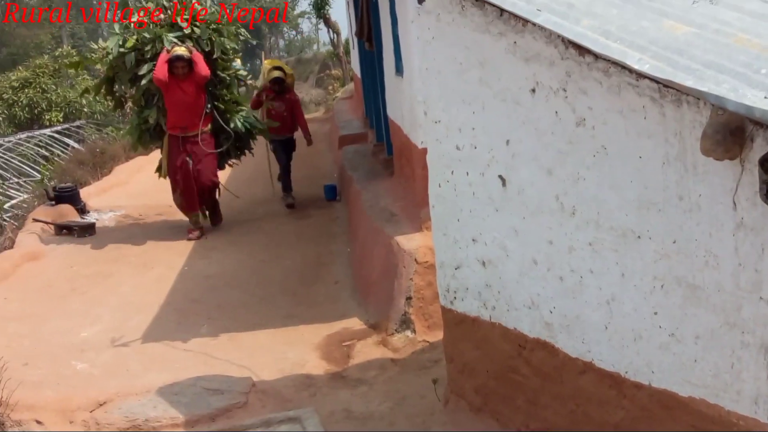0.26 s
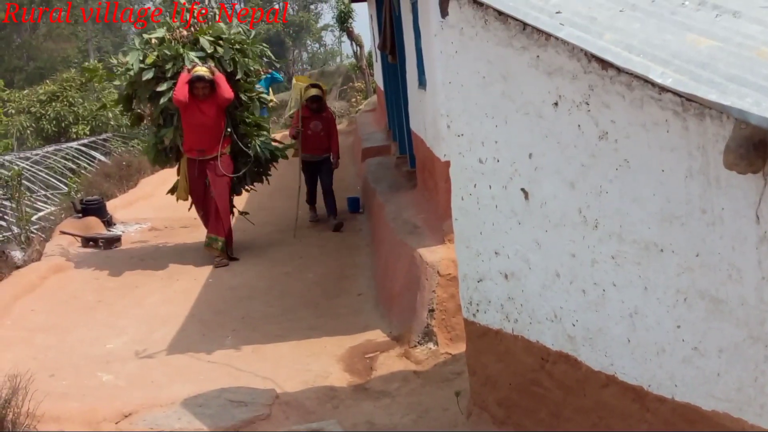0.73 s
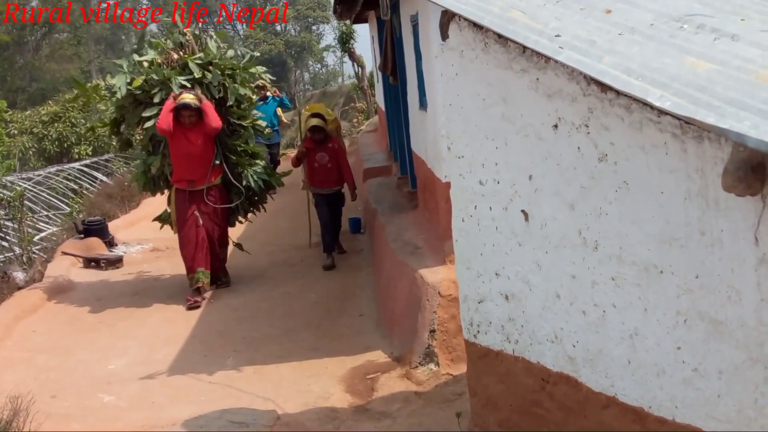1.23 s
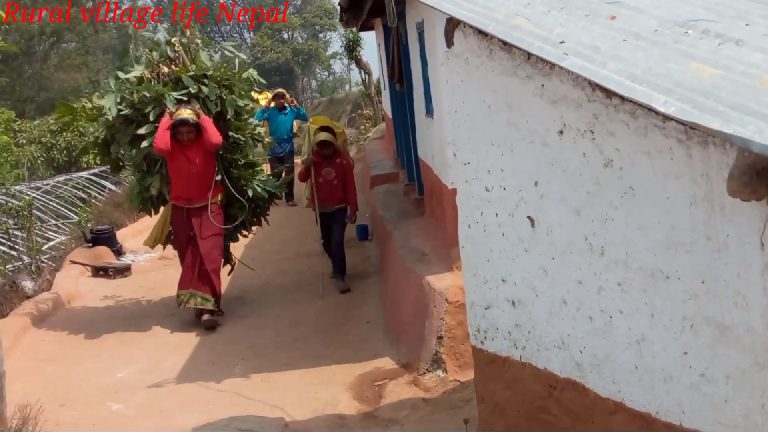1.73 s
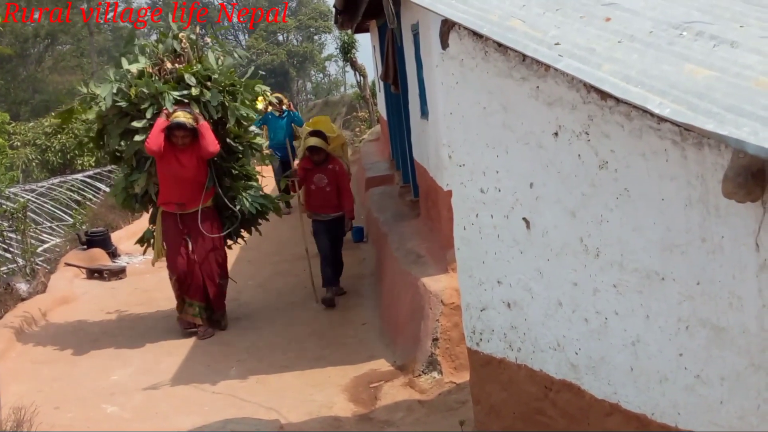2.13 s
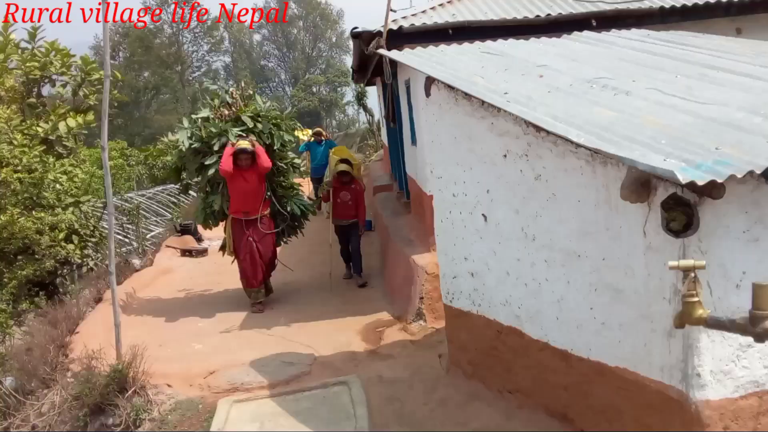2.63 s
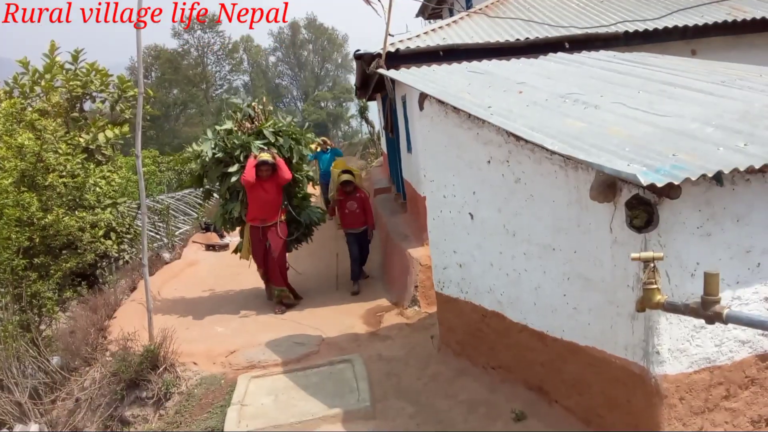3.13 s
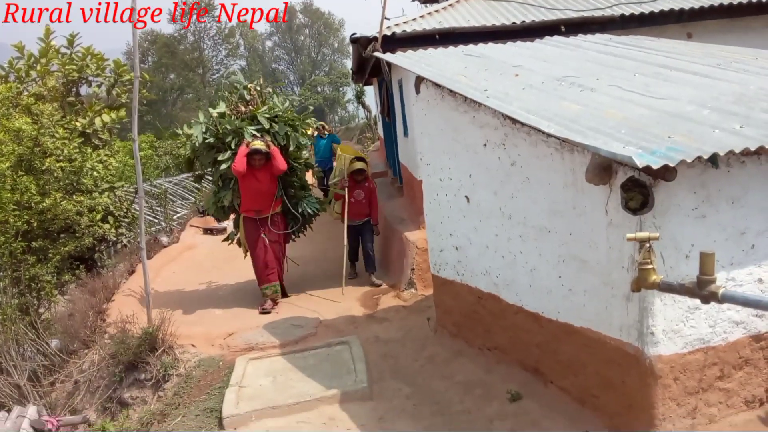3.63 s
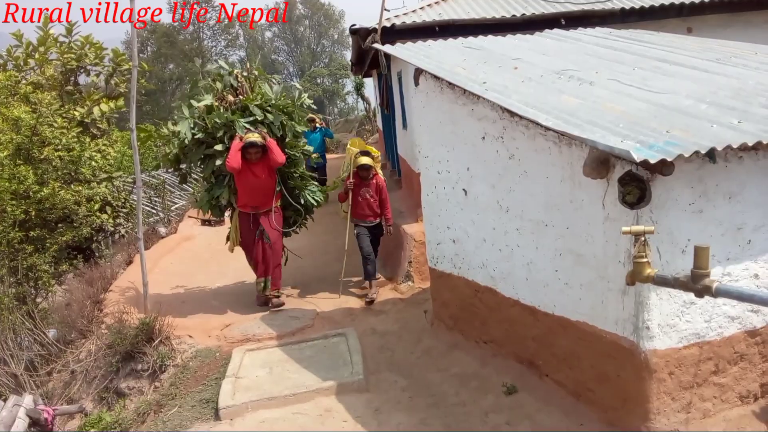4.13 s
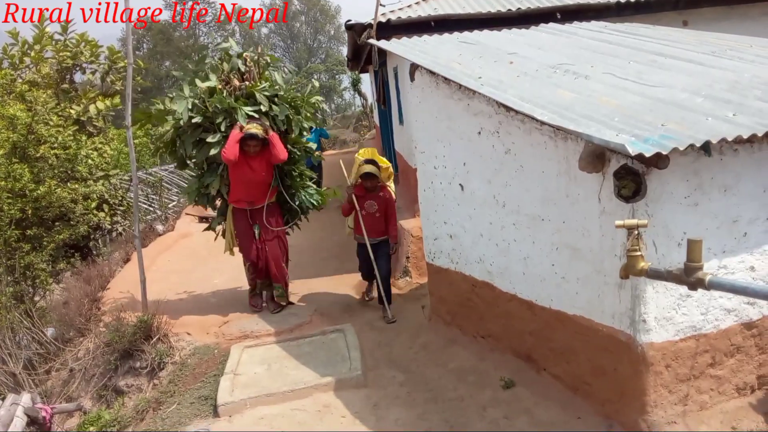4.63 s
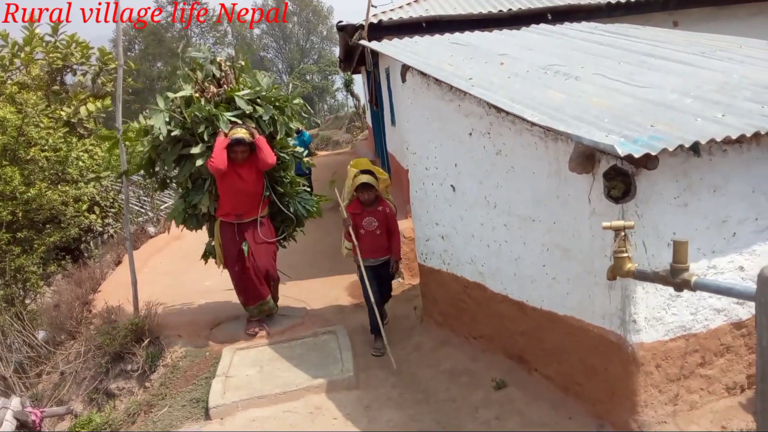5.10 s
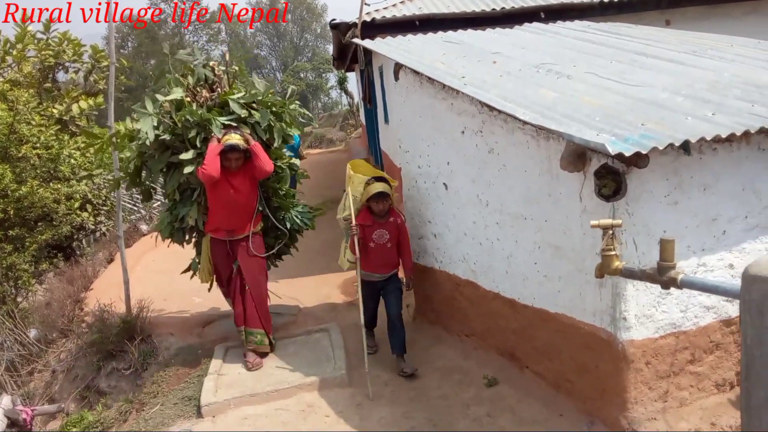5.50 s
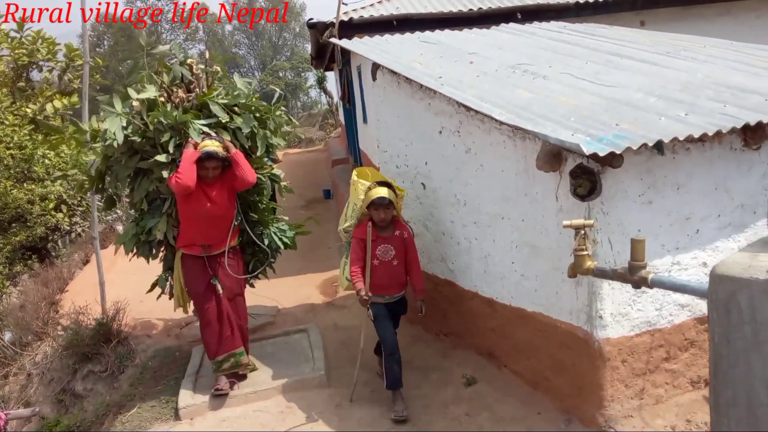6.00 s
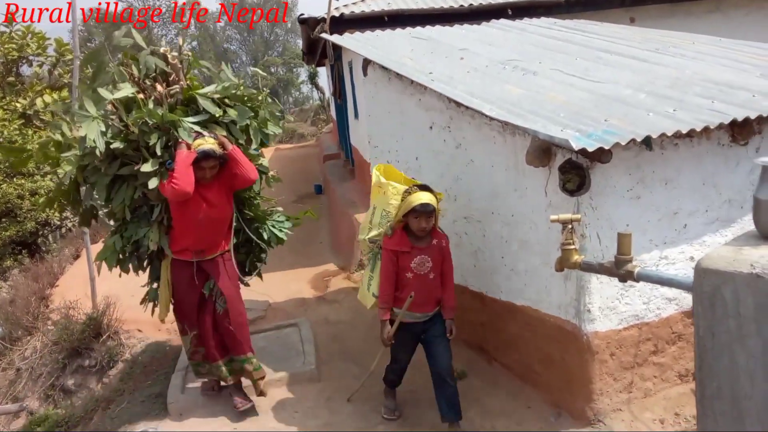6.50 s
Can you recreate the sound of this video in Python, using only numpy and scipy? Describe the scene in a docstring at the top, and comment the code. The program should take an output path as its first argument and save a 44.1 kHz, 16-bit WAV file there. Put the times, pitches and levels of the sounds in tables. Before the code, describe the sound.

Throbbing goat bleats, first low then higher, sound beside a house wall over bassy wind puffs, gritty footsteps, leaf rustle and small ticks.

```python
"""Dirt yard beside a house wall: a low-voiced nanny, three higher voices and a far kid bleat, at times overlapping.
Each bleat is a chain of throbs in pitch and loudness, about ten a second: pulses and breath through throat resonances.
Some begin as a hum until the mouth opens; a faint drone of steady partials sounds at the start.
Wind puffs thump on the microphone as lumpy bass noise; feet scuff and leaves rustle as bursts of gritty noise.
Short ticks and soft knocks of hoof on wood stand over a quiet, flickering hush of noise bands."""
import sys
import numpy as np
from scipy import signal
from scipy.io import wavfile
from scipy.ndimage import uniform_filter1d, map_coordinates

SR = 44100
rng = np.random.default_rng(int(sys.argv[2]) if len(sys.argv) > 2 else 0)


def int16_out(signal):
    """Quantize to a 16-bit WAV file."""
    q = np.round(np.clip(np.atleast_2d(signal).T, -1, 1) * 32767)
    wavfile.write(sys.argv[1], SR, q.astype(np.int16))


N = 297675

# how each voice opens its mouth: opens_s, dip_depth_db, shut_nose_db, shut_top_db, level_crest_flatness
MOUTH_MANNER = {"grunt": (.9, 31, 2, -21, 1), "nanny": (0.73, 1.9, 11, -6.5, 2.2),
                "hum": (3.9, 4, 0, -.3, 0), "wavering": (2.22, 11, 0, -12, 1),
                "steady": (3.3, 15.5, 0, 0, 1.4), "chopped": (5.5, 20.5, 2, -0.5, 1.64),
                "turned": (6.5, 12, 7, 7, 1.9), "kid": (-3, 20, .3, 2, 3.5)}
# how each voice throbs: pitch_sag (0-1), pitch_crest_flatness, dip_place between crests (0-1),
# hum_share of the throb while humming (0-1)
THROB_SWING = {"grunt": (.02, 1.5, .55, 1), "nanny": (.08, .9, .6, .4), "wavering": (.13, .75, .46, 1),
               "hum": (.01, 1, .5, 1), "steady": (.165, 2, .6, 1), "chopped": (.09, 1.8, .57, 1),
               "turned": (.07, 1.2, .52, 1), "kid": (.06, 2, .55, 1)}


def amp(db):
    """Gain of a level in dB."""
    return 10 ** (np.asarray(db) / 20)


def rms_one(x):
    """Scaled to rms 1."""
    return x / np.sqrt(np.mean(x ** 2) + 1e-20)


def band(x, low_hz, high_hz, order=2):
    """Butterworth band-pass."""
    edges_hz = [low_hz, min(high_hz, .45 * SR)]
    return signal.sosfilt(signal.butter(order, edges_hz, "band", fs=SR, output="sos"), x)


def wobble(n, hz):
    """Smooth random drift at about hz, spread near 1."""
    step = max(int(SR / hz / 16), 1)
    at = np.arange(0, n + step, step)
    knots = rng.standard_normal(size=5000)
    smooth = map_coordinates(knots, [1 + at / SR * hz * 2], order=3)
    return np.interp(np.arange(n), at, smooth)


def resonance(x, hz, width_hz):
    """Two-pole resonance with gain 1 on top."""
    r = np.exp(-np.pi * width_hz / SR)
    top = np.array([1, 0, -1]) * (1 - r * r) / 2
    return signal.lfilter(top, [1, -2 * r * np.cos(2 * np.pi * hz / SR), r * r], x)


def bump(t, at, rise, fall):
    """Envelope in dB: up 20 dB over rise, down 20 dB over fall."""
    return np.where(t < at, -20 * (at - t) / rise, -20 * (t - at) / fall)


def goats():
    """All bleats, with wall and ground echoes and a short diffuse tail from the yard."""
    # throbs of each bleat: crest_s, pitch_hz, level_db, brightness_db
    nanny_grunt = [(.475, 206.5, -40, -5)]
    nanny_first = [(.59, 259.8, -44, -5), (.658, 281, -41, -1.5), (.79, 293.6, -25, 5.5),
                   (.902, 293.3, -24.5, 5), (1.01, 290.3, -26.5, 4.5), (1.11, 278.8, -29, 3.5),
                   (1.206, 242.6, -30.5, -8), (1.25, 234.7, -33.5, -4), (1.335, 186.4, -44.5, -4)]
    far_kid = [(1.415, 544, -49, -0.5), (1.515, 529.3, -54, 1)]
    wavering = [(2.022, 425, -45.5, -4.5), (2.102, 509.5, -39, 7.5), (2.178, 519.4, -34, 4.5),
                (2.262, 515.7, -35.5, 12), (2.358, 527, -33.5, 7.5), (2.454, 516, -32, 3.5),
                (2.554, 486.3, -34.5, -3.5), (2.642, 484.7, -34, -3.5), (2.734, 434.8, -39, -5),
                (2.826, 476, -39, -1.5), (2.91, 486.5, -37.5, 0.5)]
    steady_hum = [(3.05, 378, -57, 0), (3.14, 388, -55, 0), (3.21, 398, -53, 0), (3.3, 405, -50, 0)]
    steady = [(3.35, 409.2, -37.5, 4.5), (3.444, 423, -34, 6.1), (3.532, 432, -34.5, 6.1),
              (3.624, 434.4, -36, 6.1), (3.72, 432, -35.5, 3.6), (3.812, 435.7, -37, 4.5),
              (3.92, 418.7, -36.5, 3.2), (4.012, 419.8, -35.5, 4.8), (4.092, 423, -34.5, 7.2),
              (4.184, 412.8, -37.5, 4)]
    chopped = [(5.644, 419, -47.5, -7), (5.728, 440.7, -42, 7), (5.822, 457.8, -31, 0),
               (5.912, 464.5, -30, 3.5), (6.01, 466.4, -28.5, 4.5), (6.116, 457.4, -29, 4),
               (6.214, 448.8, -31, 2.2), (6.325, 420, -36, -3.5)]
    nanny_last = [(6.125, 214.2, -51.5, -11), (6.225, 219.4, -44, -9), (6.32, 251.8, -43, -11),
                  (6.428, 259.8, -42.5, -7.5), (6.516, 260.8, -42, -12.5), (6.62, 257.7, -43, -8.5),
                  (6.735, 252, -44.5, -16)]
    # throat resonances of each bleat: centre_hz, width_hz, relative_level_db
    grunt_throat = [(210, 110, -6), (412, 120, -1), (830, 98, -22), (1250, 220, -20)]
    nanny_throat = [(265, 265, -12), (514, 260, -4), (773, 100, -2), (1146, 140, -10.5), (1738, 173, -3.5),
                    (2307, 220, -9.5), (2520, 154, -1), (2970, 127, -0.5), (3420, 97, -17.5),
                    (3824, 180, -14), (4700, 213, -18), (5680, 570, -37), (8340, 590, -46.5),
                    (9540, 350, -38.5), (12800, 2500, -48.5)]
    kid_throat = [(1140, 330, 2.5), (2720, 110, 9), (3250, 240, -7), (3630, 160, -10), (4290, 460, -6)]
    wavering_throat = [(600, 310, -1.5), (1006, 280, 1), (1577, 120, 4), (1820, 110, 0), (2350, 380, 2),
                       (3100, 420, -16.5), (3696, 260, 2), (4500, 460, -7.5), (4880, 330, -4.5),
                       (6050, 740, -15), (7270, 330, -21.5), (11200, 9400, -30)]
    hum_throat = [(400, 140, 2), (800, 150, -3), (1600, 250, -14), (2010, 180, -1), (2420, 200, -5),
                  (3000, 300, -12)]
    steady_throat = [(414, 390, -29), (866, 240, 0), (1310, 440, -2.5), (1885, 190, -0.5),
                     (2034, 240, -10.5), (2478, 132, 3), (3460, 270, -4), (3810, 240, -9), (4550, 310, -7),
                     (6030, 510, -23), (7400, 820, -31.5), (11800, 6100, -50)]
    chopped_throat = [(470, 150, -24.5), (938, 100, 0.5), (1430, 220, -7), (1807, 150, -6.5),
                      (2380, 330, -9), (2670, 250, -8), (3214, 71, -6.5), (3620, 164, -1), (4350, 510, -11),
                      (4700, 460, -12), (5560, 820, -21), (8000, 1900, -35)]
    nanny_turned_throat = [(269, 110, 0), (482, 116, -1.5), (810.5, 82, 3.5), (1700, 280, -18.5),
                           (2245, 110, 6.5), (2780, 740, -7), (3209, 290, -3), (4300, 1350, -20),
                           (5710, 330, -22)]
    # echoes of wall and ground: delay_s, level_db
    echoes = [(.009, -14), (.026, -15), (.047, -23)]
    tail_t60_s, tail_db = .2, -20

    dry = bleat(nanny_grunt, grunt_throat, "grunt")
    dry = dry + bleat(nanny_first, nanny_throat, "nanny")
    dry = dry + bleat(far_kid, kid_throat, "kid")
    dry = dry + bleat(wavering, wavering_throat, "wavering")
    dry = dry + bleat(steady_hum, hum_throat, "hum")
    dry = dry + bleat(steady, steady_throat, "steady")
    dry = dry + bleat(chopped, chopped_throat, "chopped")
    dry = dry + bleat(nanny_last, nanny_turned_throat, "turned")

    t = np.arange(SR // 2) / SR
    diffuse = band(rng.standard_normal(len(t)), 480, 3500, order=1)
    tail = diffuse * amp(-60 * t / tail_t60_s) * (t > .015)
    yard = amp(tail_db) * tail / np.sqrt(np.sum(tail ** 2))
    for delay_s, db in echoes:
        yard[int(delay_s * SR)] += amp(db)
    return dry + signal.fftconvolve(dry, yard)[:N]


def bleat(throbs, throat, name):
    """Glottal pulses and gated breath through the throat; belly throbs swing pitch and level between crest and dip."""
    # grain of each voice: pitch_jitter (0-1), phase_rasp (radians), raggedness_db, breath (0-1)
    voice_grain = {"grunt": (.003, .022, 3, .15), "nanny": (.003, .022, 3, .14),
                   "wavering": (.005, .035, 3.5, .26), "hum": (.002, .02, 3, .1),
                   "steady": (.003, .022, 2.5, .24), "chopped": (.003, .025, 2.5, .2),
                   "turned": (.004, .025, 3, .18), "kid": (.003, .02, 3, .06)}
    opening_s = .015         # how fast the mouth opens
    hum_breath = .25         # share of breath and rasp while humming
    top_follows = .57        # share of brightness in the top resonances
    top_in_dip_db = 8        # the top resonances hold up in the dips
    opens_s, _, nose_db, top_db, level_arch = MOUTH_MANNER[name]
    pitch_arch = THROB_SWING[name][1]
    jitter, rasp, ragged_db, breath = voice_grain[name]
    crest_s, crest_hz, crest_db, bright_db = np.transpose(throbs)
    dip_s, dip_hz, dip_db = throb_turns(throbs, name)

    start, end = int(dip_s[0] * SR), min(int((dip_s[-1] + .03) * SR), N)
    t = np.arange(start, end) / SR
    k = np.clip(np.searchsorted(dip_s, t) - 1, 0, len(crest_s) - 1)
    side = k + (t > crest_s[k])   # the dip on this side of the crest
    away = np.clip((t - crest_s[k]) / (dip_s[side] - crest_s[k]), 0, 1)
    away = (1 - np.cos(np.pi * away)) / 2   # 0 on the crest, 1 in the dip
    # an arch above 1 flattens the crest
    pitch = crest_hz[k] + (dip_hz[side] - crest_hz[k]) * away ** pitch_arch
    level = crest_db[k] + (dip_db[side] - crest_db[k]) * away ** level_arch
    level = level - 900 * np.maximum(t - dip_s[-1], 0)   # quick fade after the last dip
    phase = 2 * np.pi * np.cumsum(pitch * (1 + jitter * wobble(len(t), 150))) / SR

    shut = (1 - np.tanh((t - opens_s) / opening_s)) / 2
    bright = np.interp(t, crest_s, bright_db)
    cleaner = 1 - (1 - hum_breath) * shut   # the hum has less rasp and breath
    rasp, breath = rasp * cleaner, breath * cleaner

    # the folds close unevenly: every overtone swells and fades and slips in phase on its own
    pulses = 0
    for h in range(1, 46):
        swell = (h * pitch < 13000) * amp(ragged_db * wobble(len(t), 30.19))
        slipped = phase + rasp * wobble(len(t), 60)
        pulses = pulses + swell * np.cos(h * slipped + .08 * h * h)
    air = signal.lfilter([1, -.75], [1], rng.standard_normal(len(t)))   # bright hiss
    gated_air = breath * (1 + 4 * away) * (1 + np.cos(phase)) * air     # while the folds are open
    source = rms_one(pulses) * amp(1.57 * wobble(len(t), 90)) + gated_air

    nose = amp(nose_db * shut)
    mouth = amp(bright)
    top = amp(top_follows * bright + top_db * shut) * amp(top_in_dip_db * away)
    voice = 0
    for j, (hz, width, db) in enumerate(throat):
        opening = nose if hz < 700 else 1 if hz < 2000 else mouth if hz < 3200 else top
        # a wider resonance taken twice leaves dark valleys; a single one fills its skirts
        double = resonance(resonance(source, hz, 1.63 * width), hz, 1.63 * width)
        single = resonance(source, hz, width)
        voice = voice + (-1) ** j * amp(db) * opening * (double + .33 * single)
    voice = voice / np.sqrt(uniform_filter1d(voice ** 2, size=2000) + 1e-12)   # evened before the throbs
    out = np.zeros(N)
    out[start:end] = voice * amp(level)
    return out


def throb_turns(throbs, name):
    """Dips before, between and after the crests, where belly pressure sags: time, pitch and level."""
    lead_s, lead_db = .036, -18   # a bleat swells from here to its first crest
    tail_s, tail_db = .06, -2.5   # and dies to below dip depth after its last
    s, hz, db, _ = np.transpose(throbs)
    opens_s, depth_db, *_ = MOUTH_MANNER[name]
    sag, _, dip_place, hum_share = THROB_SWING[name]
    dip_s = s[:-1] + dip_place * np.diff(s)
    share = np.where(dip_s > opens_s, 1, hum_share)
    dip_hz = (hz[:-1] + hz[1:]) / 2 * (1 - sag * share)
    dip_db = (db[:-1] + db[1:]) / 2 - depth_db * share
    all_s = np.r_[s[0] - lead_s, dip_s, s[-1] + tail_s]
    all_hz = np.r_[(1 - sag) * hz[0], dip_hz, hz[-1] * (1 - sag)]
    all_db = np.r_[db[0] + lead_db, dip_db, db[-1] - depth_db + tail_db]
    return all_s, all_hz, all_db


def wind():
    """Eddies at the microphone port: lumpy bass whose sharper puffs reach higher."""
    # puffs on the microphone: peak_s, level_db, length_s
    puffs = [(.299, -43, .031), (0.396, -32.5, 0.046), (1.23, -27, 0.064), (1.327, -38, .048),
             (1.529, -45, 0.09), (2.432, -34.5, 0.024), (2.653, -25.5, 0.054), (2.721, -23, 0.04),
             (2.805, -19.5, 0.034), (2.916, -21, 0.042), (3.053, -37, 0.051), (3.349, -43, 0.1),
             (3.663, -26.5, 0.031), (3.769, -36, 0.066), (3.927, -30, .038), (3.997, -30.5, 0.029),
             (4.051, -33, 0.11), (4.223, -31.5, 0.035), (4.295, -42, 0.041), (4.597, -57.5, 0.2),
             (5.408, -23, .051), (5.514, -21, 0.072), (5.627, -30, 0.038), (5.752, -27.5, 0.059),
             (5.829, -28.5, 0.06), (6, -35, .075), (6.15, -43, 0.039), (6.303, -41, 0.1), (6.71, -52, 0.16)]
    low_hz, high_hz, upper_hz = 56, 145, 330
    calm_db = -66.5   # rumble in still air, before the gusts
    gust_db, gust_s, gust_lag_s = -24, .11, .052   # each puff leaves a longer, weaker gust
    upper_share_db, sharp_from_db, sharp_slope = -15.5, -27.5, 1.62   # louder puffs gain upper bass

    t = np.arange(0, N, 20) / SR   # power is drawn on a coarse clock
    gusts = sum(amp(db + gust_db) ** 2 * np.exp(-((t - s - gust_lag_s) / gust_s) ** 2)
                for s, db, _ in puffs)
    low = (amp(calm_db) ** 2 + gusts) * amp(4.8 * wobble(N, 28)[::20]) ** 2
    upper = low * amp(-14.5) ** 2
    for s, db, length in puffs:
        upper_db = upper_share_db + sharp_slope * max(db - sharp_from_db, 0)
        shape = amp(db) ** 2 * np.exp(-(3.07 * (t - s) / length) ** 2)
        low = low + shape
        upper = upper + shape * amp(upper_db) ** 2 * np.exp(-(4.4 * (t - s) / length) ** 2)
    thump = band(rng.standard_normal(N), low_hz, high_hz, order=3)
    edge = band(rng.standard_normal(N), high_hz, upper_hz, order=3)
    out = 0
    for noise, power in ((thump, low), (edge, upper)):
        evened = noise / np.sqrt(uniform_filter1d(noise ** 2, size=1300))   # every puff moves air
        out = out + evened * np.interp(np.arange(N) / SR, t, np.sqrt(power))
    return out


def scuffs():
    """Gritty bursts of hollow mid body and bright hiss: sudden and dull for feet, swelling and bright for leaves."""
    # scuffs of feet: peak_s, level_db, fall_s (to -20 dB)
    foot_scuffs = [(.330, -56, .05), (1.586, -48, .015), (1.835, -52, .04), (1.944, -37, .03),
                   (2.913, -39, .02), (4.848, -54, .012), (5.061, -50, .03), (5.082, -43, .02),
                   (5.305, -53, .012), (5.55, -32, .03), (5.57, -40, .04)]
    # resonances of the body: centre_hz, width_hz, relative_level_db
    body_modes = [(980, 1100, -8), (2490, 1020, 2), (3530, 160, -16)]
    # rustles of leaves: peak_s, hiss_level_db, rise_s (from -20 dB)
    leaf_rustles = [(.735, -39.5, .03), (1.265, -50.5, .04), (1.764, -56.5, .015), (2.66, -51, .03),
                    (2.75, -49, .04), (3.1, -61, .08), (3.94, -47, .017), (5.08, -55, .03),
                    (5.135, -62, .015), (5.58, -52, .03), (5.62, -54, .035), (6.085, -41, .07)]
    foot_rise_s, foot_hiss_db = .0018, -17   # hiss relative to body
    strike_db = 6                            # first contact of a foot, over its grit
    leaf_fall, leaf_body_db = 1.04, 6        # fall as a multiple of the rise; body over hiss

    t = np.arange(N) / SR
    grit = amp(4 * wobble(N, 300))
    noise = rng.standard_normal((2, N)) * grit
    body = rms_one(sum(amp(db) * resonance(noise[0], hz, width) for hz, width, db in body_modes))
    bright = band(noise[1], 7200, 19700, order=1)
    hiss = rms_one(bright - .7 * resonance(bright, 8600, 2500))   # a hollow near 8.6 kHz
    feet = [(s, db, db + foot_hiss_db, foot_rise_s, fall) for s, db, fall in foot_scuffs]
    leaves = [(s, db + leaf_body_db, db, rise, leaf_fall * rise) for s, db, rise in leaf_rustles]
    out = np.zeros(N)
    for s, body_db, hiss_db, rise, fall in feet + leaves:
        i = slice(max(int((s - 3 * rise) * SR), 0), int((s + 3 * fall) * SR))
        out[i] += amp(bump(t[i], s, rise, fall)) * (amp(body_db) * body[i] + amp(hiss_db) * hiss[i])

    strikes = np.zeros(N)
    for s, db, _ in foot_scuffs:
        strikes[int((s - foot_rise_s / 2) * SR)] = amp(db + strike_db)
    click = np.eye(1, 400)[0]
    ring = sum(amp(db) * resonance(click, hz, width) for hz, width, db in body_modes)
    return out + signal.fftconvolve(strikes, ring / np.abs(ring).max())[:N]


def ticks():
    """Ticks of twigs and grit and hoof knocks: brief dying noise around a centre; fainter ones come at random."""
    # dry ticks of twigs and grit: start_s, peak_db
    dry_ticks = [(1.502, -54), (1.6975, -64), (3.1877, -53), (3.2694, -52), (3.3747, -43), (4.384, -48.5),
                 (4.5067, -54), (4.6294, -55), (4.8474, -69), (5.2854, -56), (5.3054, -53), (5.8075, -40),
                 (6.296, -40), (6.5725, -46)]
    # soft knocks of hoof on wood: start_s, peak_db, centre_hz
    hoof_knocks = [(.108, -40.5, 407), (.225, -45, 496), (4.378, -45.5, 855), (5.445, -45.5, 900)]
    tick_hz = 5960
    out, t = np.zeros(N + SR), np.arange(SR // 10) / SR
    placed = [(s, db, tick_hz) for s, db in dry_ticks] + hoof_knocks
    faint = [(place * N / SR, -66 + 6 * loud, 2000 * 6.4 ** high)
             for place, loud, high in rng.random(size=(45, 3))]
    for s, db, hz in placed + faint:
        t60_s = .014 + 25 / hz   # lower ones die more slowly
        dying = rng.standard_normal(len(t)) * amp(-60 * t / t60_s)
        crack = band(dying, hz / 2.2, hz * 1.8, order=1 + (hz < 1000))
        out[int(s * SR):][:len(t)] += amp(db) * crack / np.abs(crack).max()
    return out[:N]


def drone():
    """A few nearly steady partials on one slowly gliding pitch."""
    # course of the drone: time_s, pitch_hz, level_db (before the partials' own levels)
    course = [(0, 287.7, -57.5), (.2, 287, -56.5), (.4, 289.5, -59), (0.481, 292, -62)]
    # its partials: multiple of the pitch, relative_level_db
    partials = [(1, -1), (2, -19), (4, -13), (5, -10.5), (6, -8.5), (8, -27)]
    s, hz, db = np.transpose(course)
    t = np.arange(int(s[-1] * SR)) / SR
    pitch = np.interp(t, s, hz) * (1 + .003 * wobble(len(t), 30))
    phase = 2 * np.pi * np.cumsum(pitch) / SR
    tone = sum(amp(d + 2.5 * wobble(len(t), 15)) * np.sin(round(h) * phase) for h, d in partials)
    return np.pad(tone * amp(np.interp(t, s, db)), (0, N - len(t)))


def hush():
    """Leaves and far yard noise in half-octave bands, each flickering a little."""
    # colour of the hush: centre_hz, relative_density_db (per Hz)
    colour = [(88, -30), (150, -3), (656, -6.5), (1110, -9), (1420, -9), (2450, -12.5), (2810, -13.5),
              (3220, -14), (8330, -29.5), (10900, -22), (15500, -31.5)]
    # its course: time_s, level_db
    course = [(0, -55), (.25, -63), (1.0, -54), (1.88, -65.5), (2.5, -59.5), (4.0, -57), (4.4, -63),
              (5.3, -65), (5.6, -55.5), (6.75, -57.5)]
    edges_hz = 150 * 2 ** np.arange(0, 7.1, .5)
    together = wobble(N, 5)   # drift shared by all bands
    white = rng.standard_normal(size=(2, N))
    hz, db = np.transpose(colour)
    out = 0
    for k, (low, high) in enumerate(zip(edges_hz, edges_hz[1:])):
        level = np.interp(np.log(low * high) / 2, np.log(hz), db)
        flicker = 1.3 * together + 2.1 * wobble(N, 10)
        out = out + amp(level + flicker) * band(white[k % 2], low, high)
    return rms_one(out) * amp(np.interp(np.arange(N) / SR, *np.transpose(course)))


def scene():
    """Everything at one microphone."""
    return (goats() + wind() + scuffs() + ticks() + drone() + hush())[None]


def record(dry):
    """The top is cut steeply, 70 dB down from 16.1 kHz."""
    return signal.sosfilt(signal.cheby2(14, 70, 16100, fs=SR, output="sos"), dry)


dry = scene()
out = record(dry)
int16_out(out)
```